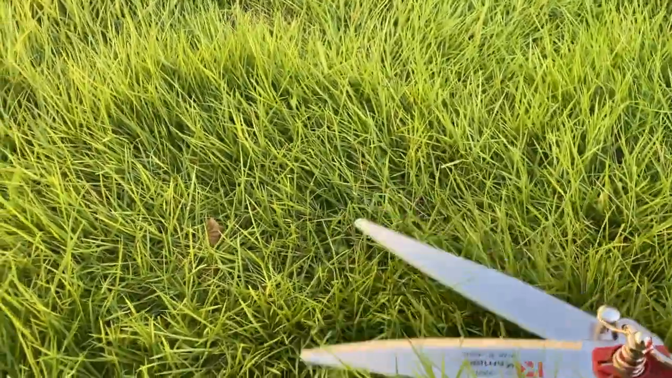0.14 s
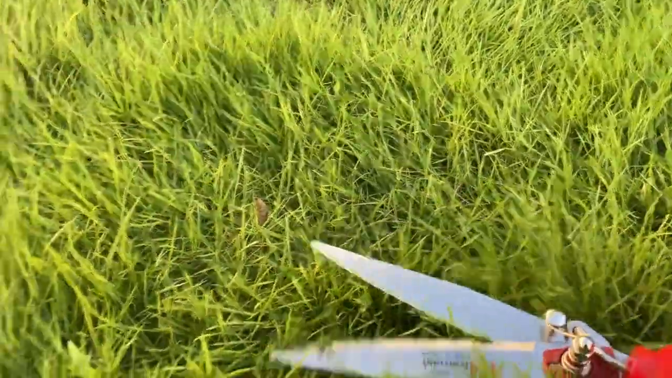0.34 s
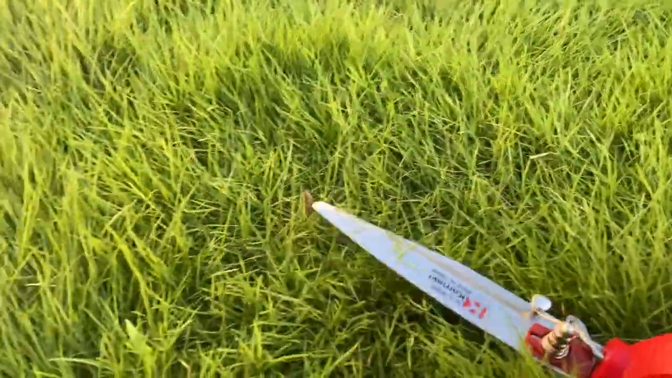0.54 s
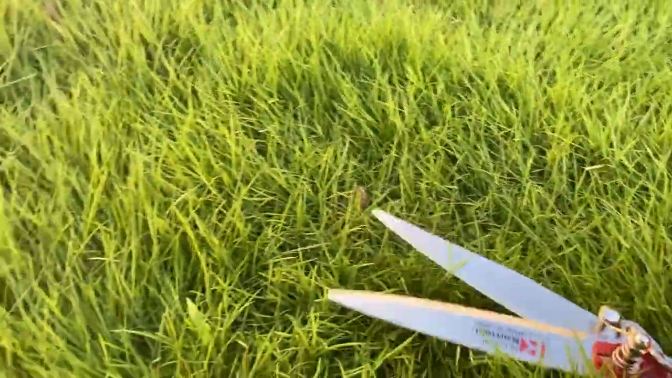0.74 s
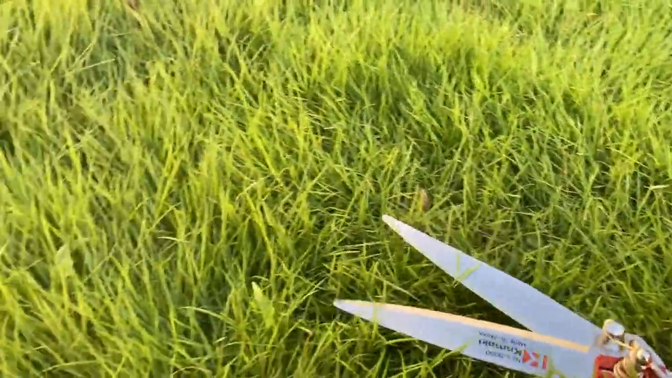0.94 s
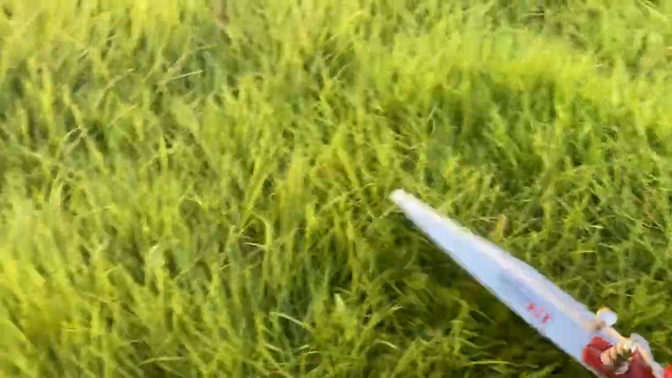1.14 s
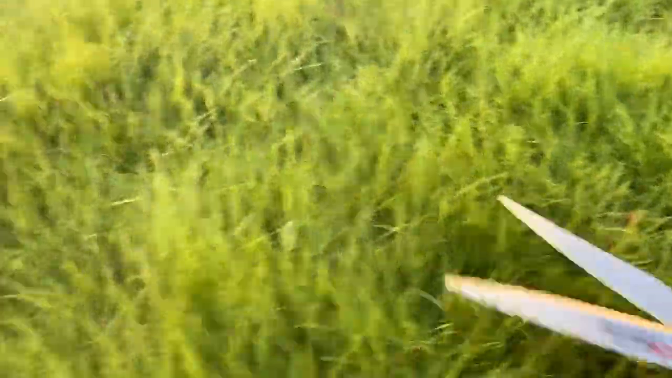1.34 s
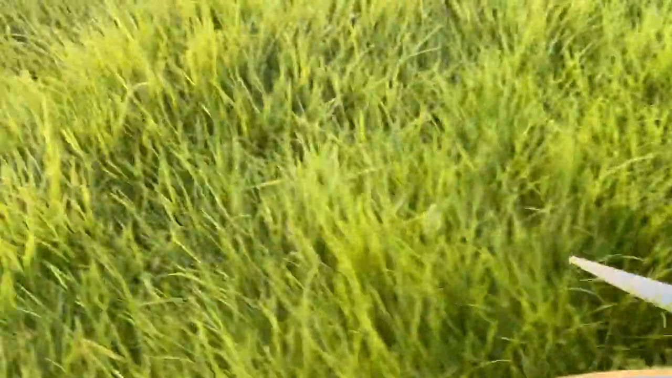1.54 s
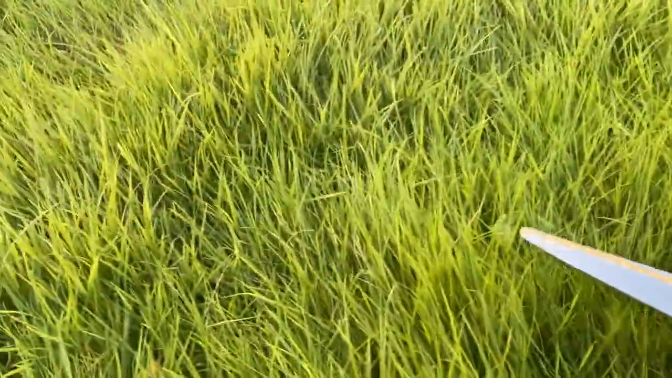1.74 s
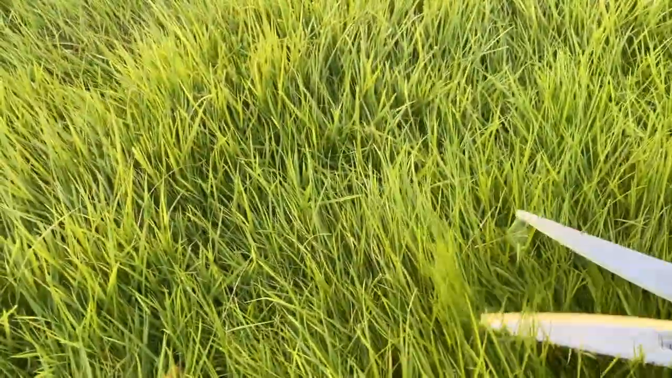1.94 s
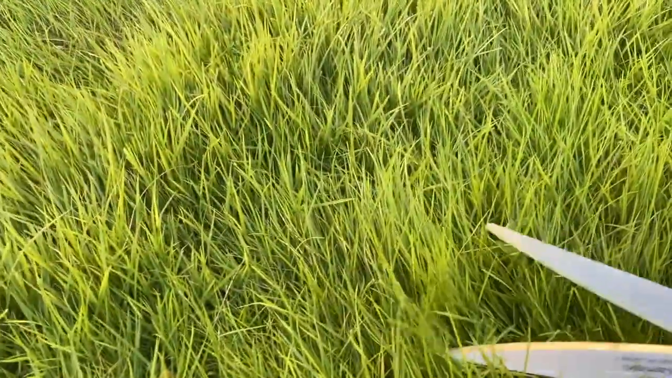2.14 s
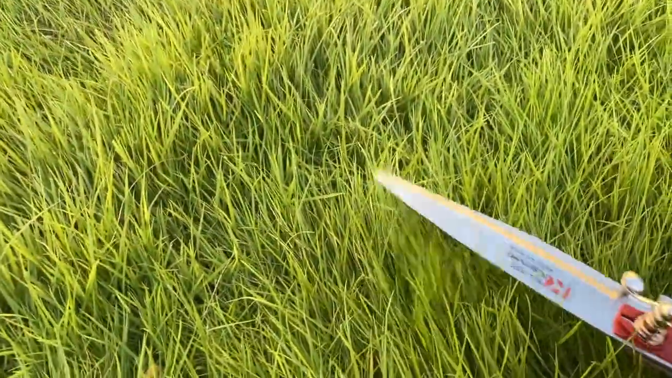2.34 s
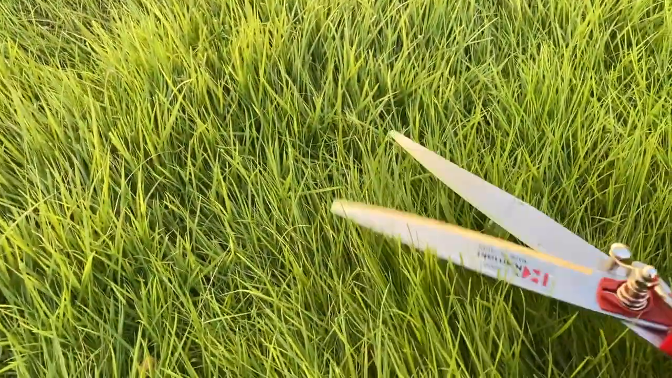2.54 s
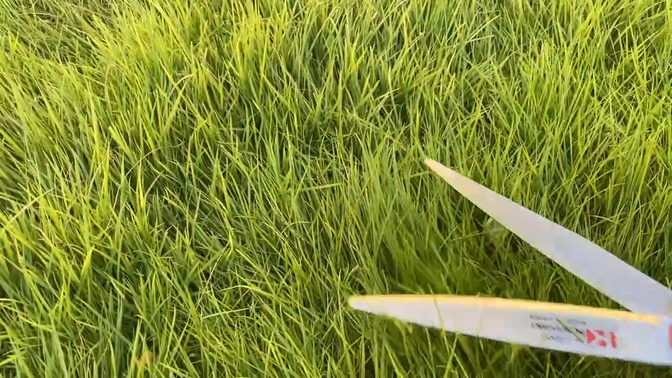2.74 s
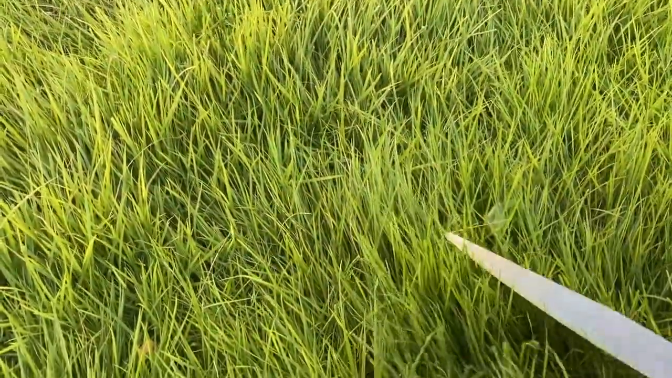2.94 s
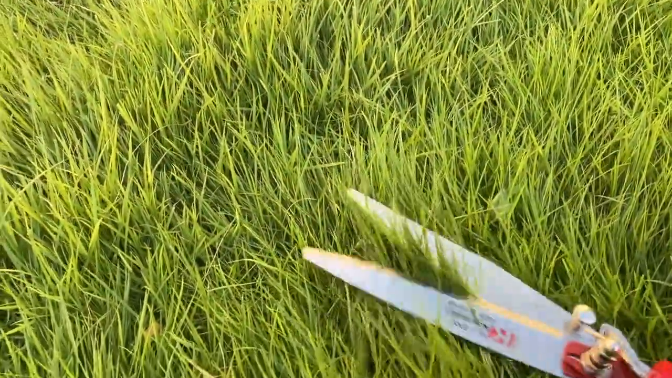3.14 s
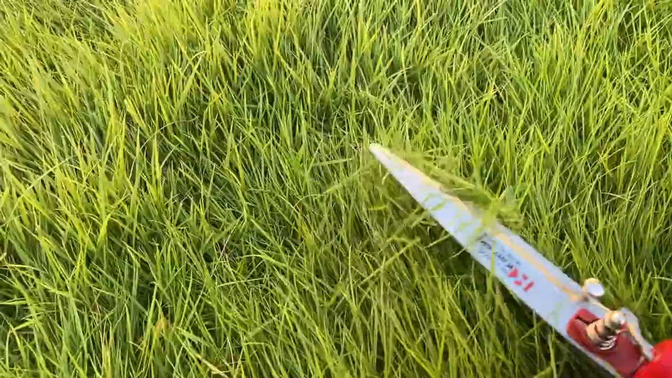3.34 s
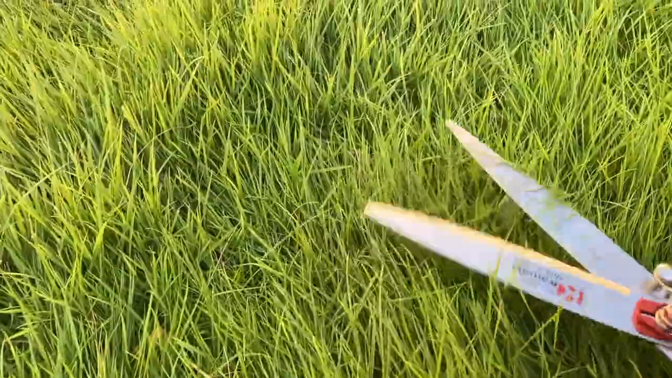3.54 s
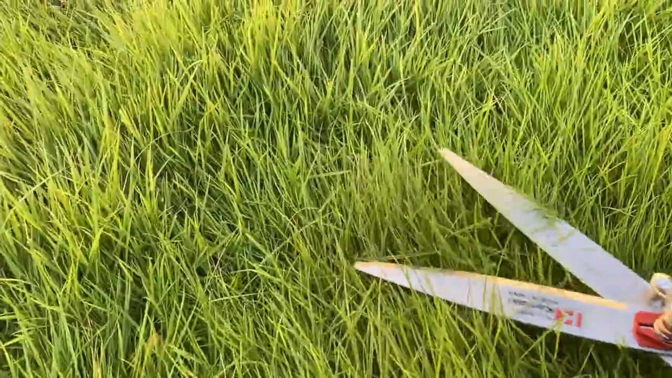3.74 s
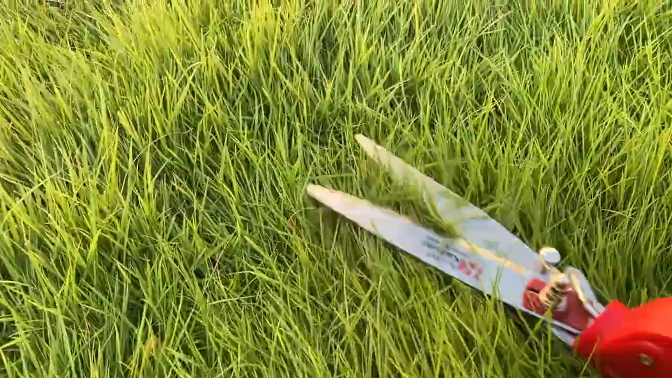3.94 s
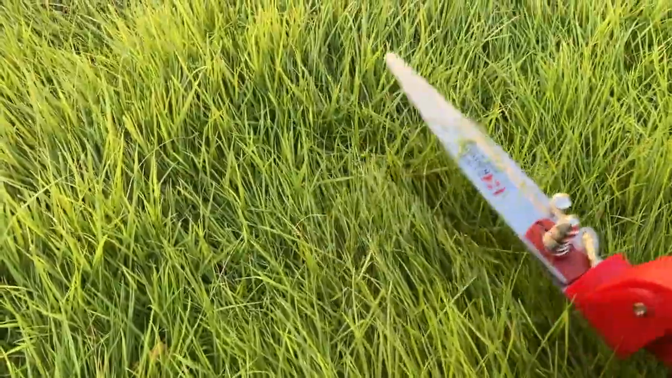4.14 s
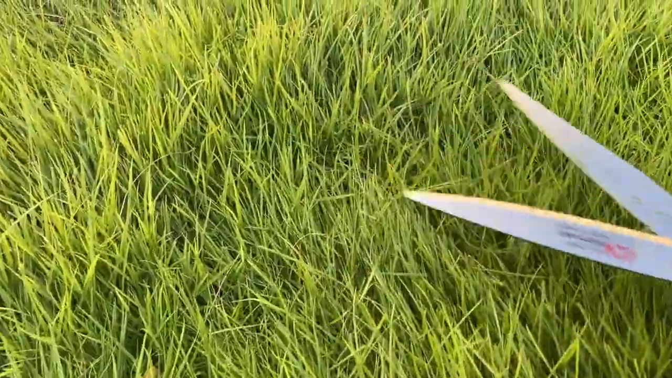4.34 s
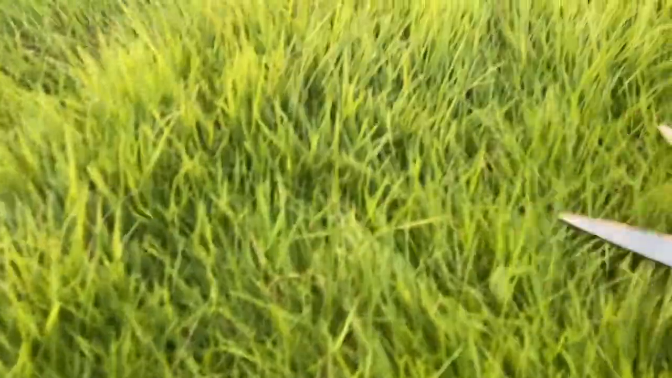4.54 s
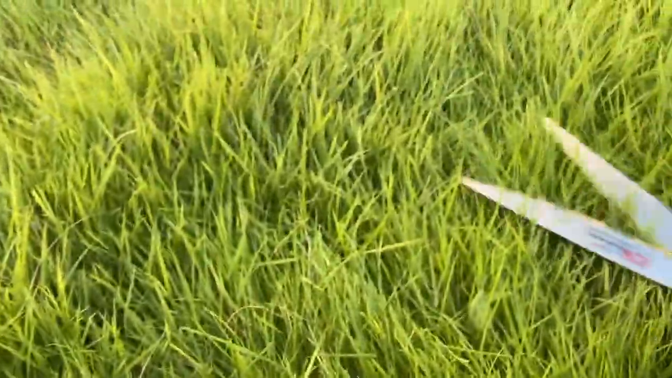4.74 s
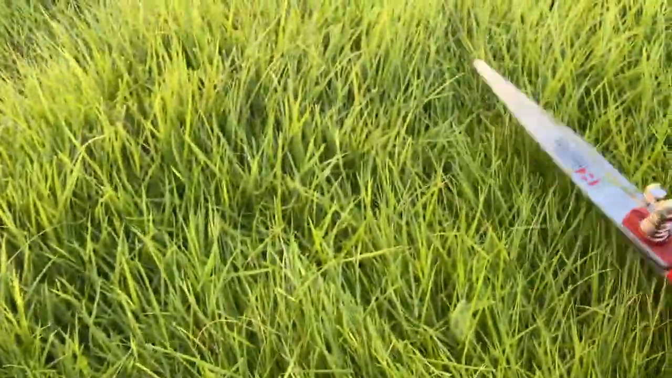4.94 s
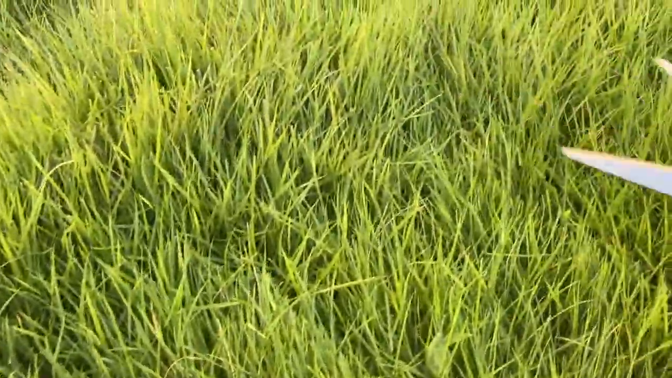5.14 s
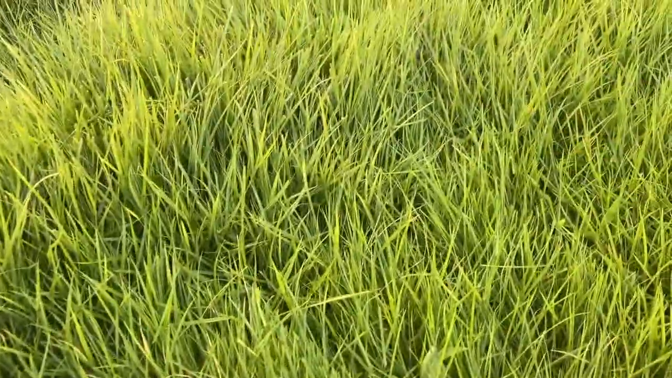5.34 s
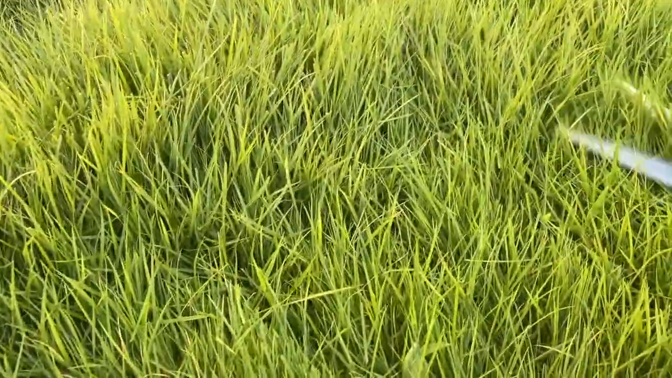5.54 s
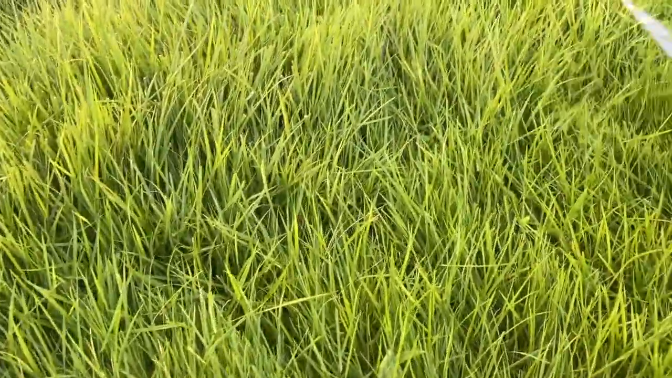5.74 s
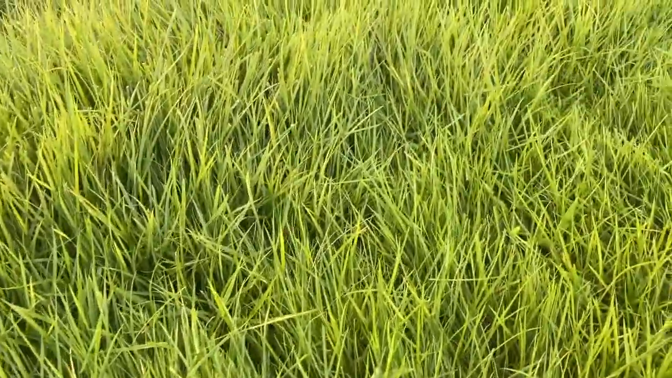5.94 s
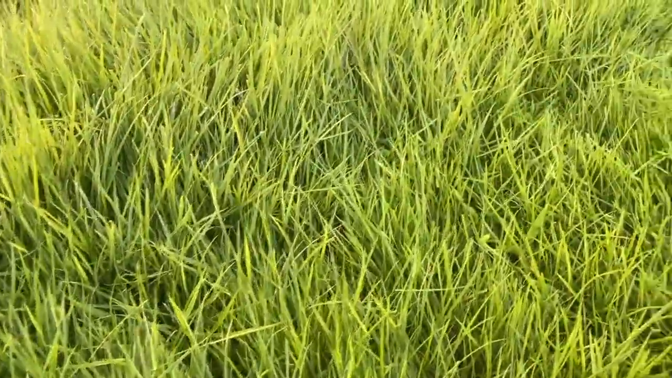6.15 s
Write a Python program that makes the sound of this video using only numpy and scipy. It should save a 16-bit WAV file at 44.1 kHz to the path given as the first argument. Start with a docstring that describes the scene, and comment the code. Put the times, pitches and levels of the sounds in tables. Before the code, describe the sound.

Outdoors on a lawn, sprung metal hand shears make eight cuts very close to a hand-held microphone. Each closing scrape sharpens into a hard, bright snip and small knock, then the blades swish open with a short falling ring. Some cuts squeak. Steady fine hiss and low rumble lie behind, a far engine swells midway, and soft handling bumps occur mostly early.

```python
"""A steady hiss over a low outdoor rumble comes first; then steel hand shears snip a lawn eight times, close by.
Each cut rubs edge on edge, shears harder and harder and ends on a stop; a spring swishes the blades open again.
Random friction slips, coloured by spectra and blade resonances, make the scrapes; gliding tones make the squeaks.
Behind them a far engine swells and fades as summed sines, and soft bumps on the microphone are low pushes and noise.
"""
import sys
import numpy as np
from scipy.fft import rfft, irfft, next_fast_len
from scipy.io import wavfile
from scipy.ndimage import map_coordinates

SR = 44100
rng = np.random.default_rng(int(sys.argv[2]) if len(sys.argv) > 2 else 0)


def wav_record(signal):
    """Record a signal, one row per channel, as 16-bit PCM in the file named by sys.argv[1]."""
    frames = np.transpose(np.atleast_2d(signal))
    bounded = np.clip(frames, -1, 1)
    # unit amplitude maps onto the largest positive 16-bit level
    quanta = np.round(bounded * 32767).astype(np.int16)
    wavfile.write(sys.argv[1], SR, quanta)


N = 276948  # length of the scene in samples
LEAD = SR // 8  # samples before and after an event's time zero
T = np.arange(-LEAD, LEAD) / SR  # seconds around one event

# Hiss body: freq_hz, relative level_db
HISS_SPECTRUM = [(200, -10), (500, -24.5), (800, -18), (1300, -21), (2000, -17.5), (3000, -15),
                 (4100, -16.5), (4600, -2.5), (5400, -2), (6000, 2), (6500, -1.5), (7100, -9), (8400, -9),
                 (9400, -19.5), (11000, -8), (15500, -10.5)]
# Thin top of the hiss: freq_hz, relative level_db
TOP_HISS_SPECTRUM = [(3000, -47), (6000, -13), (7100, 2), (8500, 2), (9400, -13), (11000, -8.5),
                     (13000, -4.5), (15000, 0.5)]
# Treble movement: time_s, level_db (only the distance below the highest level counts)
TREBLE_MOVES = [(0.0, -62), (0.82, -57.5), (3.46, -53), (3.86, -52.5), (6.28, -51.5)]
# Ground echo as the camera dips and rises: time_s, delay_ms
GROUND_DELAYS = [(0, 3.0), (1.1, 2.7), (2.1, 2.52), (3.0, 2.9), (4.6, 2.84), (6.28, 2.8)]
# Low outdoor rumble: freq_hz, relative level_db
RUMBLE_SPECTRUM = [(15, -18), (30, -33), (43, 1), (80, 1), (130, -1), (240, -6), (350, -15), (550, -24.5),
                   (1200, -26), (4000, -71)]
# Low rustle: freq_hz, relative level_db
RUSTLE_SPECTRUM = [(120, -40), (280, 3.0), (500, 4.5), (700, -14.5), (2000, -7), (6000, -47)]
# Engine orders swelling in turn: multiple of firing rate, loudest_s, level_db, half_length_s
ENGINE_ORDERS = [(.5, 3.64, -39.5, 0.32), (1, 2.75, -39.5, 0.54), (2, 3, -52, 0.45)]
# The hand shifts on the camera until it settles: time_s, level_db
HAND_SHIFTS = [(0, -45.5), (.55, -41), (.75, -55), (1.25, -53), (1.6, -42), (1.85, -56), (2.05, -44),
               (2.3, -59)]
# Soft bumps on the microphone: start_s, level_db, first_hz, length_s
SOFT_BUMPS = [(0.305, -30, 160, 0.025), (0.531, -29.5, 317, 0.016), (0.575, -26.5, 111, 0.032),
              (0.822, -21, 332, 0.0158), (1.638, -19.5, 446, 0.0095)]
# Light ticks of the handle and spring: time_s, level_db
HANDLE_TICKS = [(.307, -34), (2.210, -36.5), (2.683, -36.5), (2.828, -41.5), (3.594, -39), (3.994, -33),
                (4.305, -37)]
# Handle tap colour: freq_hz, relative level_db
TAP_SPECTRUM = [(300, -19), (1100, -1.0), (3000, -4), (9000, -21.5)]
# The crossing point runs toward the tips, the note climbs: start_s, end_s, note level_db
NOTE_CLIMBS = [(0.382, 0.458, -40), (1.082, 1.14, -48), (2.284, 2.345, -40.5), (3.135, 3.221, -43),
               (3.947, 4.019, -41), (5.567, 5.636, -47)]
# The dry edges stick and squeak: time_s, level_db, pitch_hz, half_length_s
EDGE_SQUEAKS = [(.427, -22, 7310, 0.0031), (1.103, -27.5, 7270, 0.0018), (1.6997, -21, 7760, 0.0034),
                (2.3044, -16, 8030, 0.0045), (2.3118, -19, 7480, 0.0034), (3.9945, -30.5, 7200, 0.0022),
                (4.829, -16.5, 7350, 0.0021)]
# Opening strokes: fastest_s, scrape level_db, gliding note level_db, brightness_db_per_octave
OPENING_STROKES = [(0.6867, -20.5, -33.5, 9), (1.336, -18, -42, 10), (1.928, -18, -30, 13),
                   (2.5327, -18, -25.5, 6.5), (3.5247, -17.5, -25.5, 5.5), (4.2383, -16.5, -20.5, 10),
                   (5.0561, -18.5, -28, 5.5), (5.9086, -21, -27, 7.5)]
# Closing strokes: meet_s, stop_s, rub level_db, final shear level_db, brightness_db_per_octave
CLOSING_STROKES = [(0.414, 0.4928, -43, -15, -3), (1.101, 1.1472, -36.5, -15, 0.5),
                   (1.709, 1.7504, -32.5, -22.5, 2.5), (2.308, 2.3673, -36.5, -20, 4),
                   (3.288, 3.297, -16.5, -12, -1), (4.003, 4.035, -29.5, -14.5, 0.5),
                   (4.822, 4.8626, -29, -17.5, -3.5), (5.651, 5.6754, -34.5, -13, -2.5)]
# The edges catch hard, or the handles knock on the stop (at 3.303 s): time_s, scrape level_db, blade ring drive_db
EDGE_CATCHES = [(.436, -31, -28), (0.4722, -27, -31), (0.487, -15, -25.5), (2.332, -34, -27),
                (3.3031, -22, -22), (4.017, -22, -26), (4.85, -20, -29.5)]
# Blade resonances: freq_hz, width_hz, level_db
BLADE_MODES = [(1648, 114, 1), (1875, 195, -3.5), (2400, 740, -5.5), (2835, 160, 0), (3305, 215, -3.5),
               (3510, 360, -4.5), (4970, 395, -2)]
# Scrape of a closing cut: freq_hz, relative level_db
SHEAR_SPECTRUM = [(200, -42), (700, -23), (1300, -27), (4000, -21), (5300, -10.5), (6800, -3), (8100, 1.5),
                  (9500, -2.5), (11200, -2), (13000, -10), (15500, -13.5)]
# Scrape of an opening swish: freq_hz, relative level_db
SWISH_SPECTRUM = [(300, -45), (1100, -47), (3000, -2), (4200, -12), (5300, -4.5), (7000, -2.5),
                  (8200, -0.5), (9500, -5.5), (11200, -7.5), (13000, -17), (15500, -29)]
# Left-right likeness of the shears: freq_hz, likeness (0-1)
NEAR_LIKENESS = [(1600, 0.98), (3000, 0.66), (4500, 0.24), (6000, 0.7), (7000, 1), (11000, 1), (15000, 0.1)]
# Left-right likeness of distant and handling noise: freq_hz, likeness (0-1)
FAR_LIKENESS = [(100, 0.89), (300, 0.67), (700, 0.047), (4000, 0.19), (6000, 0.34), (7200, 1), (15000, 1)]
# The sound reaches the left port late: freq_hz, lag_ms
LEFT_LAG = [(300, 0.075), (1000, 0.14), (2900, .13), (4600, 0.27), (5600, 0.29), (7000, 0.29),
            (9200, 0.2727), (11400, 0.2664), (15500, 0.251)]
# Left port over right port: freq_hz, level_db
LEFT_OVER_RIGHT = [(100, -2.3), (600, 0.52), (1500, 0.52), (2600, 1.7), (4500, -0.5), (9000, 0.02)]

# background
RUMBLE_DB, RUMBLE_SWELL_DB, HISS_DB = -46, 4, -42  # rumble before the swell; its rise with the engine; hiss body
TOP_HISS_DB, TREBLE_SWING = -41, 2.6  # hiss top at its strongest; dB of swing per dB of treble movement
GROUND_SHARE = 0.4  # gain of the hiss's echo off the ground
RUSTLE_S, RUSTLE_HALF_S = 1.1, 0.18  # when the rustle swells; half length
RUSTLE_DB, RUSTLE_REST_DB = -52.5, -65  # the swell; the resting level beneath it
# far engine
ENGINE_S, ENGINE_HALF_S = 3.0, 1  # peak and half length of the rumble's swell
FIRING_HZ, REV_HZ_PER_S = 85.2, 2.2  # firing rate at ENGINE_S, and how fast it rises
# bumps
BUMP_END_HZ, SHUDDER_S = 60.6, 0.053  # pitch a push sinks toward; a bump this long would be all shudder
# climbing note
CLIMB_FROM_HZ, CLIMB_TO_HZ, RASP_DB = 2050, 3750, -1  # range of the note; rasp relative to it
# opening
OPEN_RISE_S, OPEN_FALL_S, OPEN_RING_DB = 0.0094, 0.013, -17  # scrape swell and fade; ring drive relative to it
NOTE_REST_HZ, NOTE_DROP_HZ, NOTE_SINK_S = 1836, 2294, .015  # resting pitch; scale and time constant of the sink
# closing
BITE_S, SWELL_S, HALT_S = 0.0098, 0.0095, 0.0026  # edges take hold; shear grows toward the tips; the stop halts it
RUB_RING_DB, RING_FOLLOWS = -21, 0.39  # ring drive at a rub of 0 dB; dB of ring drive per dB of rub
RUB_UNEVEN_DB = 2  # stalks make the rub come and go
SNAP_DB, SNAP_S = -0.5, 0.00092  # tips snap past each other: level relative to the shear, half length
KNOCK_DB, KNOCK_FOLLOWS = -27, 0.64  # knock of the stop at a shear of 0 dB; dB of knock per dB of shear
KNOCK_RING_DB, KNOCK_RING_S = 5, 0.008  # the knock's push on the blades, relative to it; its decay
CATCH_S = 0.0027  # half length of a catch or late knock
TOP_HZ = 15850  # upper band limit


def amp(db):
    """Decibels to gain."""
    return 10 ** (np.asarray(db) / 20)


def unit(x):
    """Scale to rms 1."""
    return x / np.sqrt(np.mean(np.abs(x) ** 2) + 1e-20)


def along(points, hz):
    """Read (freq_hz, value) points on a log frequency axis."""
    f, v = np.transpose(points)
    return np.interp(np.log(hz + 1), np.log(f + 1), v)


def curves(rows):
    """One value per sample for each column after the time."""
    s, *cols = np.transpose(rows)
    return [np.interp(np.arange(N) / SR, s, c) for c in cols]


def wobble(rate, size):
    """A smooth random curve of size samples, rate knots a second."""
    knots = rng.standard_normal(int(size * rate / SR) + 4)
    return map_coordinates(knots, [np.arange(size) * rate / SR])


def ripple(hz, spacing_hz):
    """Random unevenness over frequency: the steel's crowded high modes, drawn anew at each call."""
    return map_coordinates(rng.standard_normal(512), [hz / spacing_hz], mode="mirror")


def hump(s, half):
    """A smooth rise and fall around time s, peaking at 1 and halved at half seconds away."""
    return 2 ** -(((np.arange(N) / SR - s) / half) ** 2)


def filtered(x, response):
    """Shape x by a complex response of frequency."""
    n = x.shape[-1]
    m = next_fast_len(n + 4096)
    return irfft(rfft(x, m) * response(np.fft.rfftfreq(m, 1 / SR)), m)[..., :n]


def add(track, s, sound):
    """Mix an event into the track with its time zero at s."""
    at = round(s * SR) - LEAD
    track[:, max(at, 0):at + len(T)] += sound[..., max(-at, 0):]


def spread(pair, colour, alike):
    """Two unrelated signals become a coloured, partly alike stereo pair of rms 1."""
    def mid_side(hz):
        turn = np.arccos(np.clip(along(alike, hz), -1, 1)) / 2
        return colour(hz) * np.array([np.cos(turn), np.sin(turn)])

    mid, side = filtered(pair, mid_side)
    return unit(np.array([mid + side, mid - side]))


def noise(spectrum):
    """Distant stereo noise of rms 1."""
    return spread(rng.standard_normal((2, N)), lambda hz: amp(along(spectrum, hz)), FAR_LIKENESS)


def background():
    """Hiss with its echo off the ground, a low rustle, and an uneven rumble that grows with the engine."""
    treble_db, = curves(TREBLE_MOVES)
    top_db = TOP_HISS_DB + TREBLE_SWING * (treble_db - treble_db.max())
    hiss = amp(HISS_DB) * noise(HISS_SPECTRUM) + amp(top_db) * noise(TOP_HISS_SPECTRUM)

    echo_ms, = curves(GROUND_DELAYS)
    earlier = np.arange(N) - echo_ms * SR / 1000
    echo = np.array([map_coordinates(port, [earlier]) for port in hiss])

    stir = amp(RUSTLE_REST_DB) + amp(RUSTLE_DB) * hump(RUSTLE_S, RUSTLE_HALF_S)
    rustle = stir * amp(3.3 * wobble(30, size=N)) * noise(RUSTLE_SPECTRUM)

    rumble_db = RUMBLE_DB + RUMBLE_SWELL_DB * hump(ENGINE_S, ENGINE_HALF_S) + 1.4 * wobble(14, size=N)
    rumble = amp(rumble_db) * noise(RUMBLE_SPECTRUM)
    return hiss + GROUND_SHARE * echo + rustle + rumble


def engine():
    """A far engine speeds up slightly; its drone passes from the firing note to the octave below."""
    steady_hz = FIRING_HZ + REV_HZ_PER_S * (np.arange(N) / SR - ENGINE_S)
    firing_hz = steady_hz * (1 + 0.0092 * wobble(7, size=N))
    phase = 2 * np.pi * np.cumsum(firing_hz) / SR
    orders = sum(amp(db) * hump(s, half) * np.sin(multiple * phase) for multiple, s, db, half in ENGINE_ORDERS)
    return np.sqrt(2) * orders  # table levels are rms


def shudder(top_hz, size):
    """Low noise of a hand on the camera's body, rms 1."""
    def low(hz):
        cubed = (hz / 40) ** 3
        return cubed / (1 + cubed) / (1 + (hz / top_hz) ** 4)

    return spread(rng.standard_normal((2, size)), low, FAR_LIKENESS)


def push_envelope(length):
    """A push swells to 1 at length seconds and dies away; also returns time in lengths."""
    u = np.maximum(T, 0) / length
    return u, u ** 2 * np.exp(2 - 2 * u)


def thud(first_hz, last_hz, length):
    """A dull push whose pitch sinks as it swells and dies."""
    u, envelope = push_envelope(length)
    pitch = last_hz + (first_hz - last_hz) * np.exp(-2 * u)
    return np.sin(2 * np.pi * np.cumsum(pitch * (T > 0)) / SR) * envelope


def bumps():
    """The hand-held camera shudders unevenly and is jolted softly: the longer the jolt, the more it shudders."""
    handling_db, = curves(HAND_SHIFTS)
    out = amp(handling_db + 3.4 * wobble(16, size=N)) * shudder(top_hz=114, size=N)
    for s, db, first_hz, length in SOFT_BUMPS:
        rough = min(length / SHUDDER_S, 1)
        _, envelope = push_envelope(length)
        shake = shudder(first_hz, size=len(T)) * envelope
        push = thud(first_hz, BUMP_END_HZ, length)
        add(out, s, amp(db) * ((1 - rough) * push + 0.66 * rough * shake))
    return out


def slips(rate, smooth, clump_db):
    """Friction force: tiny random slips over a smooth rub, coming in clumps."""
    jumps = (rng.random(len(T)) < rate / SR) * rng.standard_normal((2, len(T)))
    rub = smooth * rng.standard_normal(jumps.shape)
    return (unit(jumps) + rub) * amp(clump_db * wobble(498.5, size=len(T)))


def chirps(rate, life, lowest_hz, highest_hz):
    """Brief moments when the slipping locks onto one high mode of the steel, rms 1 in all."""
    when, pitch, size, phase = rng.random((4, round(rate * len(T) / SR), 1))
    t = np.arange(-256, 256)
    hz = lowest_hz + pitch * (highest_hz - lowest_hz)
    grains = size * np.exp(-(t / SR / life) ** 2) * np.sin(2 * np.pi * (hz * t / SR + phase))
    places = ((when * len(T)).astype(int) + t) % len(T)
    return unit(np.bincount(places.ravel(), grains.ravel(), len(T)))


def scrape(spectrum, bright_db, rate):
    """The bright sound of one edge slipping over the other, rms 1."""
    def colour(hz):
        tilt_db = bright_db * np.log2(np.clip(hz, 4000, None) / 8000)  # tilts only above 4 kHz
        return amp(along(spectrum, hz) + tilt_db + 3.5 * ripple(hz, spacing_hz=220))

    locked = [chirps(rate=900, life=.0028, lowest_hz=1500, highest_hz=13000) for port in range(2)]
    friction = slips(rate, smooth=0.54, clump_db=1.0) + .65 * np.array(locked)
    return spread(friction, colour, NEAR_LIKENESS)


def blade(hz):
    """Response of the blades' damped bending resonances, in alternating polarity."""
    total = 0
    for k, (centre, width, db) in enumerate(BLADE_MODES):
        damping = 1j * hz * width
        total = total + (-1) ** k * amp(db) * damping / (centre * centre - hz * hz + damping)
    return total


def ring(force):
    """Slips of a given strength over time set the blades ringing, at the rms of that force."""
    drive = slips(rate=700, smooth=.3, clump_db=3) * amp(3 * wobble(130, size=len(T)))
    colour = lambda hz: blade(hz) * amp(3 * ripple(hz, spacing_hz=170))
    return spread(drive * force, colour, NEAR_LIKENESS) * np.sqrt(np.mean(force ** 2))


def glide(pitch_hz, width_hz):
    """A narrow resonance, rubbed into sound in fits and starts, whose pitch moves."""
    drive = wobble(width_hz, size=len(T)) + 1j * wobble(width_hz, size=len(T))
    fits = amp(4 * wobble(170, size=len(T)))
    return unit(np.real(fits * drive * np.exp(2j * np.pi * np.cumsum(pitch_hz) / SR)))


def ticks():
    """Play in the handle taps the blades lightly."""
    out = np.zeros((2, N))
    for s, db in HANDLE_TICKS:
        tap = amp(db) * np.exp(-(T / 0.0018) ** 2)
        colour = lambda hz: amp(along(TAP_SPECTRUM, hz))
        handle = spread(rng.standard_normal((2, len(T))), colour, NEAR_LIKENESS)
        add(out, s, ring(0.49 * tap) + 0.54 * tap * handle)
    return out


def climbs():
    """Before the bite the edges rasp lightly, and the blade's note climbs."""
    out = np.zeros((2, N))
    for start, end, db in NOTE_CLIMBS:
        travel = np.clip(T / (end - start), 0, 1)
        force = np.sqrt(np.abs(np.sin(np.pi * travel)))
        # a shorter free blade sounds higher
        pitch = 1 / np.interp(travel, [0, 1], [1 / CLIMB_FROM_HZ, 1 / CLIMB_TO_HZ])
        rasp = ring(amp(-3) * force) + force * scrape(SWISH_SPECTRUM, bright_db=-3, rate=1500)
        add(out, start, amp(db) * (force * glide(pitch, width_hz=180) + amp(RASP_DB) * rasp))
    return out


def squeaks():
    """Stick-slip locks into a short whistle that sags in pitch."""
    out = np.zeros((2, N))
    for s, db, pitch_hz, half in EDGE_SQUEAKS:
        pitch = pitch_hz * (1 - .018 * np.tanh(T / half) + 0.0073 * wobble(902, size=len(T)))
        phase = 2 * np.pi * np.cumsum(pitch) / SR
        tone = unit(np.sin(phase) + amp(-28) * np.sin(2 * phase))
        grit = amp(-15.0) * scrape(SHEAR_SPECTRUM, bright_db=-16, rate=5000)
        add(out, s, amp(db) * np.exp(-np.abs(T / half) ** 3) * (tone + grit))
    return out


def swell(at, rise, fall):
    """A smooth rise to 1 at time at, then an exponential fade."""
    return np.exp(-np.where(T < at, ((T - at) / rise) ** 2, (T - at) / fall))


def opening():
    """The spring flings the blades apart; their note sinks as the crossing point runs back to the pivot."""
    out = np.zeros((2, N))
    # the pitch holds until 13 ms, then sinks
    pitch = NOTE_REST_HZ + NOTE_DROP_HZ * np.exp(-np.maximum(T - .010, .003) / NOTE_SINK_S)
    for s, db, note_db, bright_db in OPENING_STROKES:
        swish = scrape(SWISH_SPECTRUM, bright_db, rate=5500)
        edge = amp(db) * swell(0, OPEN_RISE_S, OPEN_FALL_S) * swish
        body = ring(amp(db + OPEN_RING_DB) * swell(0.0052, rise=0.019, fall=0.022))
        note = amp(note_db) * swell(.018, rise=.007, fall=.009) * glide(pitch, width_hz=600)
        add(out, s, edge + body + note)
    return out


def catches():
    """A snag of the edges or a knock on the stop: a short hard scrape that also sets the blades ringing."""
    out = np.zeros((2, N))
    burst = np.exp(-(T / CATCH_S) ** 2)
    for s, db, ring_db in EDGE_CATCHES:
        edge = amp(db) * burst * scrape(SHEAR_SPECTRUM, bright_db=-4.0, rate=6200)
        add(out, s, edge + ring(amp(ring_db) * burst))
    return out


def closing():
    """The edges rub, shear harder toward the tips, snap shut and hit the stop; a harder cut knocks harder."""
    out = np.zeros((2, N))
    halt = np.exp(-np.maximum(T, 0) / HALT_S)
    shear = np.exp(np.minimum(T, 0) / SWELL_S) + amp(SNAP_DB) * np.exp(-(T / SNAP_S) ** 2)
    for meet, stop, rub_db, shear_db, bright_db in CLOSING_STROKES:
        contact = np.clip((T + stop - meet) / BITE_S, 0, 1) * halt
        rub = amp(rub_db + RUB_UNEVEN_DB * wobble(107.7, size=len(T)))
        force = (rub + amp(shear_db) * shear) * contact
        edge = force * scrape(SHEAR_SPECTRUM, bright_db, rate=3500)

        knock = amp(KNOCK_DB + KNOCK_FOLLOWS * shear_db)
        blow = knock * amp(KNOCK_RING_DB) * (T > 0) * np.exp(-np.abs(T) / KNOCK_RING_S)
        body = ring(amp(RUB_RING_DB + RING_FOLLOWS * rub_db) * contact + blow)
        add(out, stop, edge + body + knock * thud(first_hz=1390, last_hz=197, length=0.00444))
    return out


def scene():
    """The shears over the garden's background."""
    behind = background() + engine() + bumps()
    return behind + ticks() + climbs() + squeaks() + opening() + catches() + closing()


def record(dry):
    """Two ports differ in arrival time and slightly in level; loud peaks are rounded, then the top is cut."""
    def port_response(hz):
        # each port takes half the lag and half the level difference
        lag = np.exp(np.outer([-1, 1], 1j * np.pi * hz * along(LEFT_LAG, hz) / 1000))
        return lag * amp(np.outer([.5, -.5], along(LEFT_OVER_RIGHT, hz)))

    ports = filtered(dry, port_response)
    rounded = ports / (1 + np.abs(ports / .85) ** 4) ** (1 / 4)
    return filtered(rounded, lambda hz: hz < TOP_HZ)


dry = scene()
out = record(dry)
wav_record(out)
```